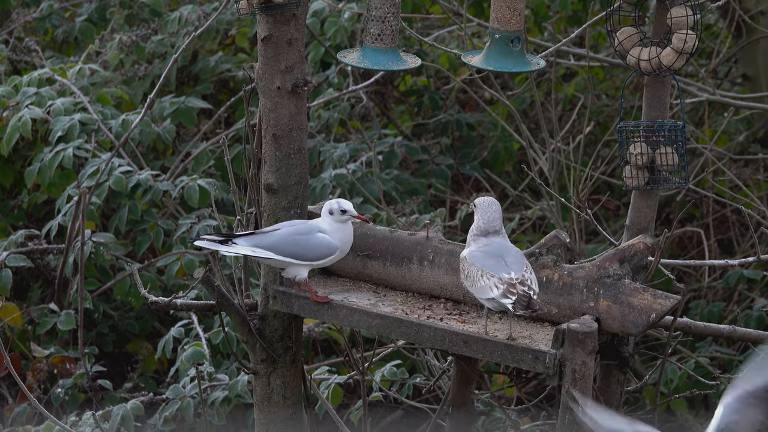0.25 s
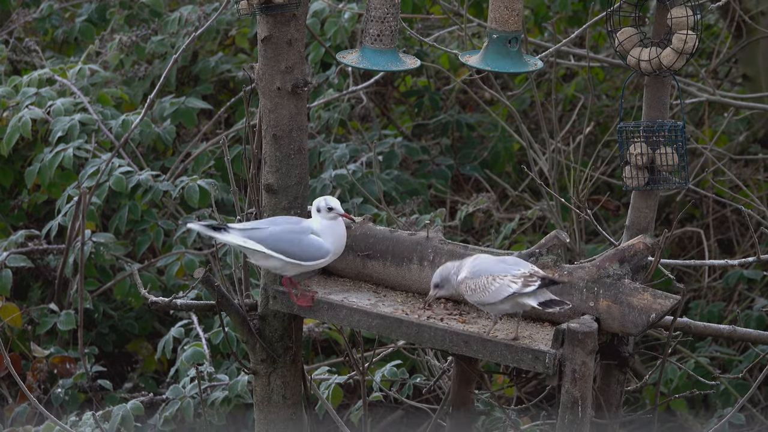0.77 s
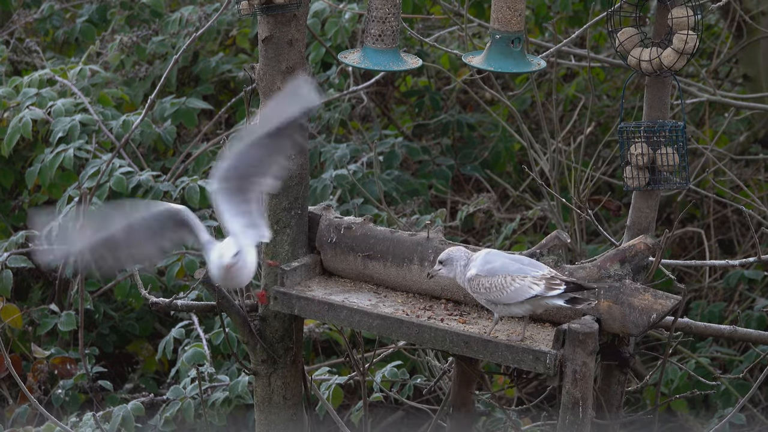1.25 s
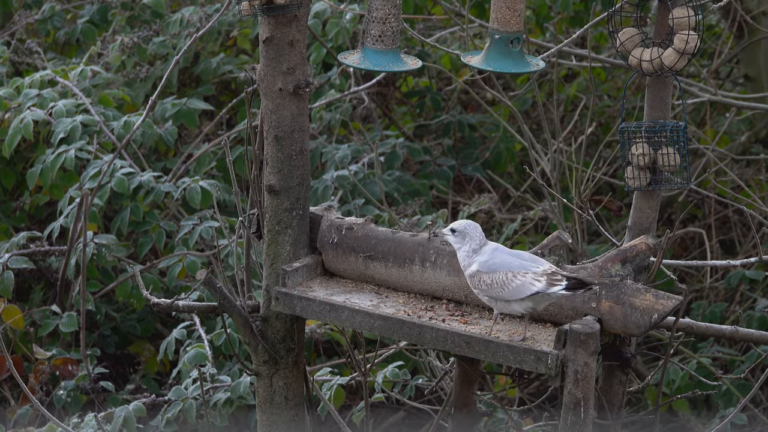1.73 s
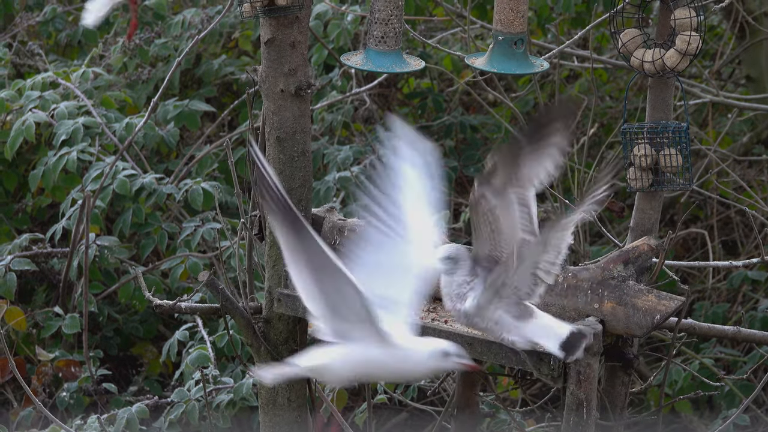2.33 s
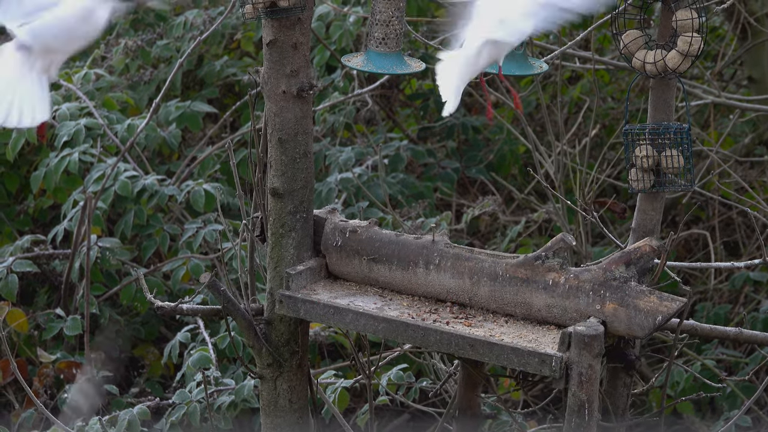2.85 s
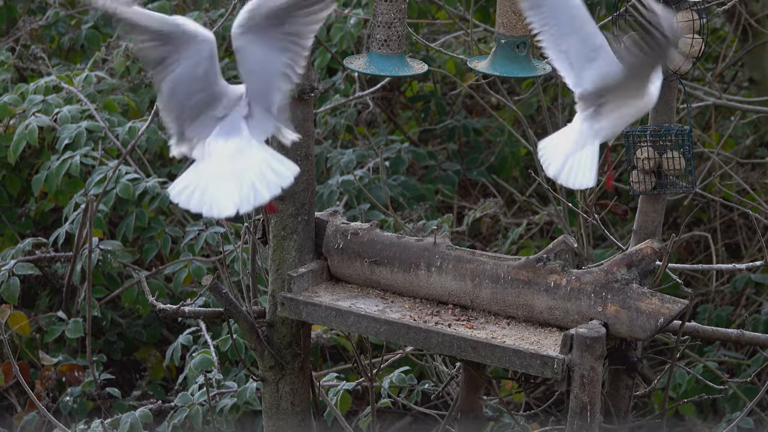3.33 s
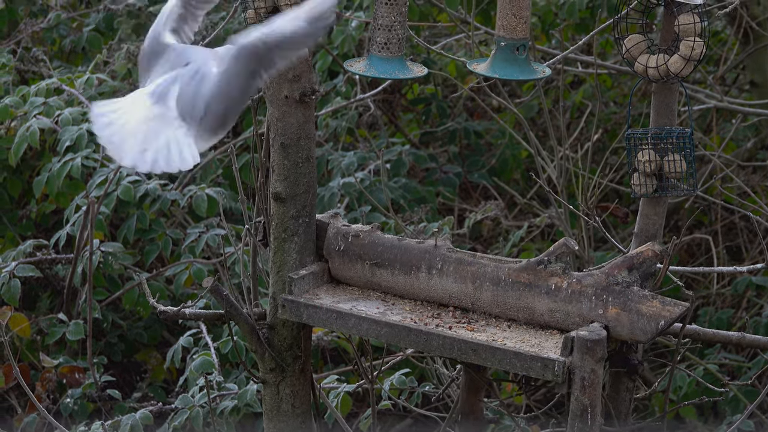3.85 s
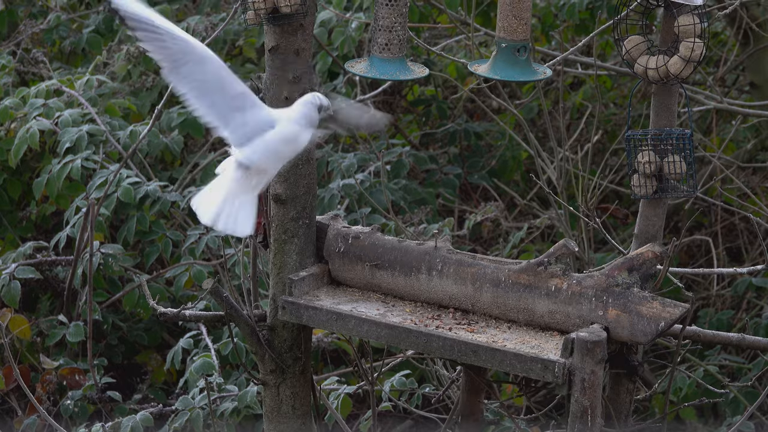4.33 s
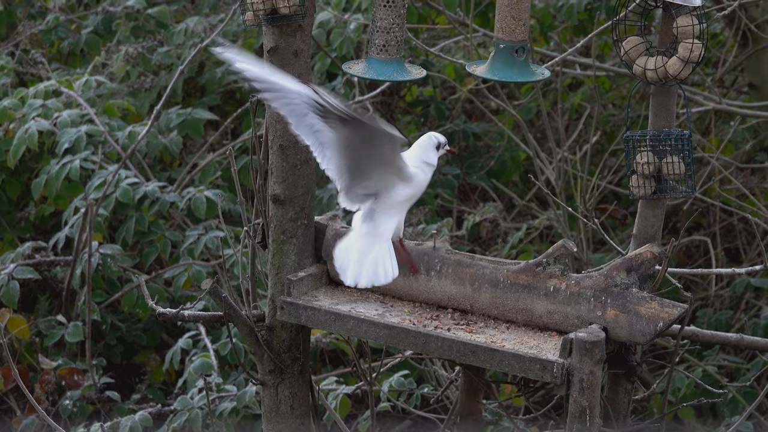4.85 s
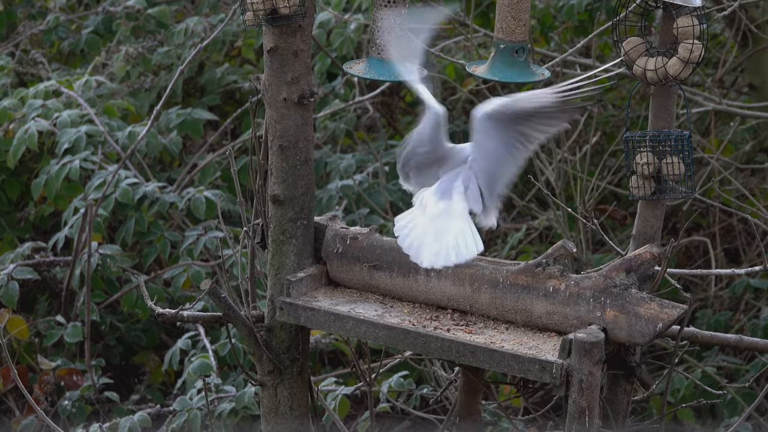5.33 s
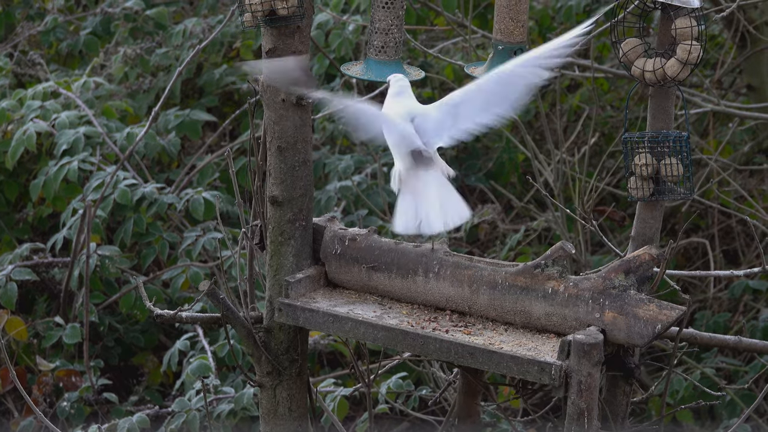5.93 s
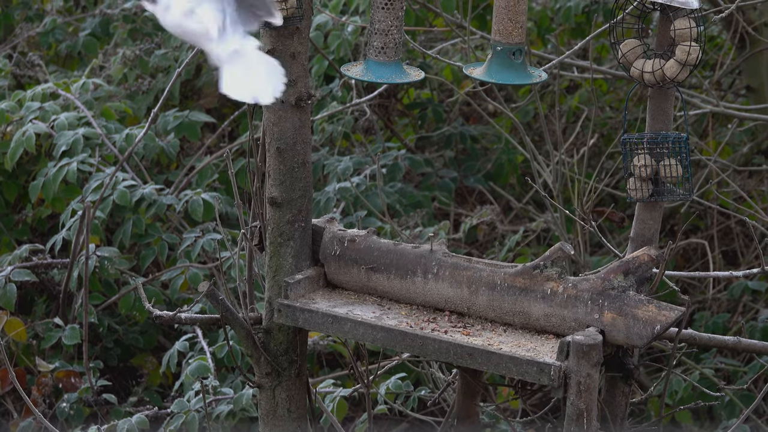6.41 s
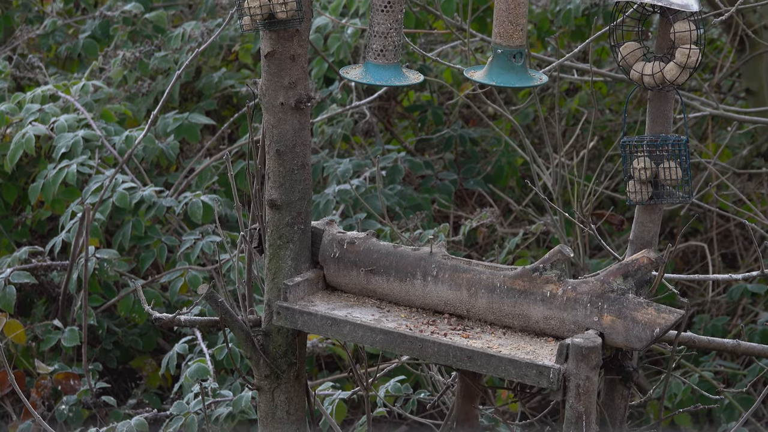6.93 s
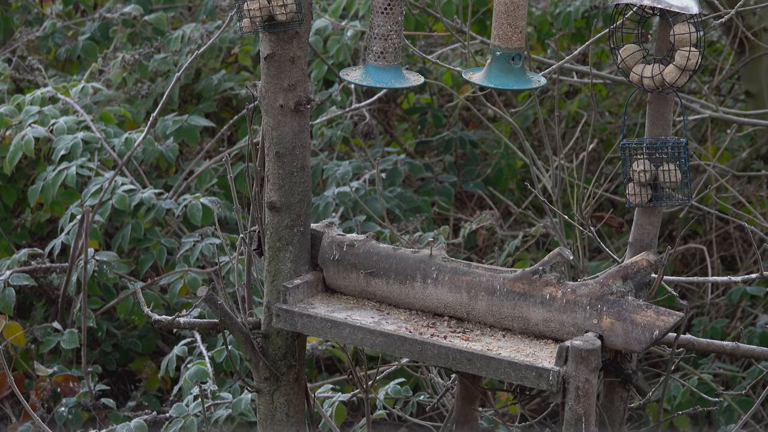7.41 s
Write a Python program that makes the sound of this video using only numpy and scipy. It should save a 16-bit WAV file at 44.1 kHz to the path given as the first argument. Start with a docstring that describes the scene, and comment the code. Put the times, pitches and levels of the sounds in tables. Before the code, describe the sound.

Close gulls whine and chatter outdoors, then one screams hoarsely again and again over a faint distant flock, finishing on a growling cry.

```python
"""Gulls squabbling in a garden

Thin falling whines, short rattling keks, then a run of harsh arched cries and a low growl.
Voices are sums of partials shaped by throat and beak; a harsh cry shuts and reopens about 90 times a second.
Hedges scatter the calls. Behind lie more gulls, taps on a wooden tray, wingbeats and a far engine
(a few low sine orders), with coloured noise for air, hiss and rumble."""
import sys
import numpy as np
from scipy import signal
from scipy.fft import rfft, irfft, next_fast_len
from scipy.io import wavfile
from scipy.ndimage import uniform_filter1d

SR = 44100
rng = np.random.default_rng(int(sys.argv[2]) if len(sys.argv) > 2 else 0)


def wav_record(signal):
    """Record a signal, one row per channel, as 16-bit PCM in the file named by sys.argv[1]."""
    frames = np.transpose(np.atleast_2d(signal))
    bounded = np.clip(frames, -1, 1)
    # unit amplitude maps onto the largest positive 16-bit level
    quanta = np.round(bounded * 32767).astype(np.int16)
    wavfile.write(sys.argv[1], SR, quanta)


N = 338247
CUTOFF_HZ = 15800

# Throat colour of the harsh cries. Each row: frequency in Hz, relative gain in dB.
CRY_THROAT = [(350, -48), (600, -18.5), (1000, -16.5), (1400, -4), (1950, -3.5), (2500, -0.5), (2900, -9.5),
              (3400, -23.5), (4000, -13), (4900, -16.5), (5600, -32.5), (6500, -50), (9000, -58),
              (11000, -74)]


def from_db(db):
    """Decibels to gain."""
    return 10 ** (np.asarray(db) / 20)


def rms_one(x):
    """Scale to unit power."""
    return x / np.sqrt(np.mean(x ** 2) + 1e-20)


def seconds(length_s):
    """Sample times from zero to the given length."""
    return np.arange(int(length_s * SR)) / SR


def bell(t, width_s):
    """1 at time zero, dying away smoothly on both sides."""
    return np.exp(-(t / width_s) ** 2)


def at_hz(points, hz):
    """Gain of a spectrum at the given frequencies, interpolated over log frequency."""
    f, db = np.transpose(points)
    return from_db(np.interp(np.log(hz + 1e-9), np.log(f), db))


def over_time(rows):
    """A (time, value) table interpolated over the whole scene."""
    return np.interp(np.arange(N) / SR, *np.transpose(rows))


def read(rows):
    """Sample times across a table, then each of its columns at those times."""
    s, *columns = np.transpose(rows)
    t = np.arange(int(max(s[0], 0) * SR), int(s[-1] * SR)) / SR
    return [t] + [np.interp(t, s, c) for c in columns]


def add(out, start_s, x):
    """Mix a sound in at its start time, trimmed to the scene."""
    i = int(start_s * SR)
    x, i = x[max(-i, 0):], max(i, 0)
    out[i:i + len(x)] += x[:max(N - i, 0)]


def coloured(x, spectrum):
    """Pass a sound through a smooth spectrum."""
    size = next_fast_len(len(x) + 512)
    gain = at_hz(spectrum, np.fft.rfftfreq(size, 1 / SR))
    return irfft(rfft(x, size) * gain, size)[:len(x)]


def noise(spectrum, size):
    """Coloured noise of unit power."""
    return rms_one(coloured(rng.standard_normal(size), spectrum))


def drift(rate_hz, size):
    """Random wandering with a spread near 1."""
    at = np.arange(size) * rate_hz / SR
    knots = int(at[-1]) + 2
    return np.interp(at, np.arange(knots), rng.standard_normal(knots))


def evened(x):
    """Hold the power steady over about 23 ms."""
    return x / np.sqrt(np.abs(uniform_filter1d(x * x, size=1000)) + 1e-12)


def faded(x):
    """Soft start and stop of a few milliseconds."""
    return x * signal.windows.tukey(len(x), min(1, 300 / len(x)))


def flutter(rate_hz, size, unevenness):
    """Opening of the syrinx, 0 to 1: rounded pulses with sharp closures between them."""
    turns = rng.random() + np.cumsum(rate_hz * (1 + unevenness * drift(rate_hz, size))) / SR
    return np.abs(np.sin(np.pi * turns))


def harmonics(pitch_hz, throat, beak_hz=2000, beak_db=0, beak_width_hz=300, count=26):
    """The voice's partials, weighted by the throat and by the resonance of the open beak."""
    k = np.arange(1, count + 1)[:, None]
    hz = k * pitch_hz
    beak = from_db(beak_db / (1 + ((hz - beak_hz) / beak_width_hz) ** 2))
    gain = at_hz(throat, hz) * beak * (hz < CUTOFF_HZ)
    phase = 2 * np.pi * np.cumsum(hz, axis=1) / SR + k * k / 2
    return evened(np.sum(gain * np.sin(phase), axis=0))


def with_effort(x, level_db, treble_db):
    """Effort sets the loudness of a call and, apart from it, the strength of its upper resonances."""
    low = signal.sosfiltfilt(signal.butter(8, 3250, fs=SR, output="sos"), x)
    return faded(from_db(level_db) * (evened(low) + from_db(treble_db) * evened(x - low)))


def harsh_cry(pitch_hz, level_db, treble_db, beak_hz, roughness, pulse_hz, swing, jitter, rasp,
              beak_db, beak_width_hz):
    """Pitch climbs and arches within every pulse, and shakes at random most as the voice closes."""
    attack_s = .017
    pulse_sweep = .035   # share by which pitch climbs through a pulse, scaled by roughness
    pulse_spread, pulse_spread_db = .016, 3.5   # pulses differ in pitch and in strength
    size = len(pitch_hz)
    weak = np.clip((level_db.max() - level_db) / 15, 0, 1)
    rough = np.clip(roughness, 0, 1) + .45 * weak   # hoarser at the weak start and end
    opening = flutter(pulse_hz, size, unevenness=.07)

    arch = (opening - np.pi / 4) * (1 + .35 * drift(pulse_hz, size))
    climb = -np.gradient(opening ** 2) * SR / (np.pi * pulse_hz)
    shake = (1.04 - opening) * drift(700, size)
    bend = swing * arch + pulse_sweep * climb + pulse_spread * drift(pulse_hz, size) + jitter * shake
    pitch_hz = pitch_hz * (1 + rough * bend)

    tone = harmonics(pitch_hz, CRY_THROAT, beak_hz, beak_db, beak_width_hz)
    pulses = .07 + opening ** (.45 + .25 * rough)
    crackle = from_db(3.2 * rough ** 2 * drift(300, size))
    air = rasp * rough * noise(CRY_THROAT, size)
    highpass = signal.butter(4, 520, "high", fs=SR, output="sos")
    voice = signal.sosfilt(highpass, tone * pulses * crackle + air)
    attack = np.minimum(np.arange(size) / SR / attack_s, 1)
    level_db = level_db + pulse_spread_db * rough ** 2 * drift(pulse_hz, size) / 2
    return attack * with_effort(voice, level_db, treble_db)


def cries(beak_db=13, beak_width_hz=440):
    """Each cry scoops up to its top pitch as the beak opens, holds, then droops."""
    # Each row: start in seconds, length in seconds, pitch rise in seconds, swell in seconds,
    # start pitch in Hz, top pitch in Hz, end pitch in Hz, level in dB, treble in dB re level,
    # open-beak resonance in Hz, base roughness 0-1.
    cry_rows = [(3.206, 0.16, 0.051, 0.023, 638, 964, 810, -32, -13.5, 2410, 0.8),
                (3.689, 0.19, 0.045, 0.027, 609, 1010, 717, -27.5, -17.5, 2140, 0.74),
                (4.154, 0.23, .058, 0.044, 573, 907, 637, -29, -13, 2220, 0.94),
                (4.561, 0.23, 0.069, 0.083, 530.3, 840.6, 774, -25, -14, 2266, 0.77),
                (4.958, 0.26, 0.076, 0.063, 588, 977, 870, -25.5, -15, 2000, 0.8),
                (5.368, 0.24, .037, 0.056, 672.6, 1009, 916, -26, -22, 2010, 0.56),
                (5.712, .21, 0.036, 0.064, 629.7, 1015, 930, -24, -25.5, 2010, .42),
                (6.065, .21, .038, 0.043, 656, 990, 886, -25, -26, 1874, 0.48),
                (6.395, 0.22, .052, 0.07, 667, 978, 839, -24.5, -14, 1740, 0.59),
                (6.742, 0.24, 0.15, 0.053, 625, 722, 658, -25.5, -10, 2300, 0.5),
                (7.132, .25, 0.096, 0.082, 526.4, 696.5, 618, -26, -11, 2090, 0.4)]
    droop_s, droop_db, swell_db = .035, 14, 12
    thin_treble_db = 2   # the weak ends are thinner than the middle
    beak_opening, beak_closing = .18, .05   # share by which the resonance lies lower at start and end
    out = np.zeros(N)
    for (start_s, length_s, rise_s, swell_s, start_hz, top_hz, end_hz,
         level_db, treble_db, beak_hz, roughness) in cry_rows:
        t = seconds(length_s)
        scoop, swell, droop = bell(t, rise_s), bell(t, swell_s), bell(length_s - t, droop_s)
        pitch_hz = top_hz + (start_hz - top_hz) * scoop + (end_hz - top_hz) * droop
        level = level_db - swell_db * swell - droop_db * droop
        treble = treble_db + thin_treble_db * (swell + droop)
        beak = beak_hz * (1 - beak_opening * scoop - beak_closing * droop)
        cry = harsh_cry(pitch_hz, level, treble, beak, roughness, pulse_hz=90, swing=.19, jitter=.1,
                        rasp=.12, beak_db=beak_db, beak_width_hz=beak_width_hz)
        add(out, start_s, cry)
    return out


def growl(beak_db=34, beak_width_hz=600, chest_db=-15.5):
    """A close cry that pulses more slowly, with a low rasp under it."""
    # Each row: time in seconds, pitch in Hz, level in dB, treble in dB re level, beak resonance in Hz.
    growl_rows = [(7.385, 677, -34, -10, 1490), (7.399, 639.7, -31, -22, 1480),
                  (7.421, 741.5, -33, -26.5, 1630), (7.437, 625.2, -29, -26, 1564),
                  (7.471, 758, -27, -28.5, 1530), (7.541, 823.4, -23, -28, 1536),
                  (7.67, 741.5, -22.5, -22, 1710)]
    chest_spectrum = [(380, -44), (650, -2.5), (1050, 12), (1400, 0)]   # Hz, dB
    out = np.zeros(N)
    t, *controls = read(growl_rows)
    cry = harsh_cry(*controls, roughness=.55, pulse_hz=58, swing=.2, jitter=.26, rasp=.2,
                    beak_db=beak_db, beak_width_hz=beak_width_hz)
    add(out, t[0], cry)
    chest = coloured(out * (1 + drift(900, N)), chest_spectrum)
    return out + from_db(chest_db) * chest


def through_registers(t, registers):
    """Pitch, level, treble and gape of a whine: sags and fades in a register, then slides to the next."""
    sag_per_s, fade_db_per_s = .56, 11   # exponential rate of the pitch sag; fall of the level
    state = None
    for s, slide_s, hz, level_db, treble_db, gape_db in registers:
        pitch_hz = hz * np.exp(-sag_per_s * (t - s))
        level = level_db - fade_db_per_s * (t - s)
        held = np.array(np.broadcast_arrays(pitch_hz, level, treble_db, gape_db))
        if state is None:
            state = held
        else:
            state = state + (held - state) * (1 + np.tanh(2 * (t - s) / slide_s)) / 2
    return state


def whines(beak_hz=2650, beak_width_hz=380, beak_gain_db=10, crack_s=0.0072):
    """Falling stacks of partials; at a catch or sudden drop the voice sags and turns hoarse briefly."""
    # Each row: end in seconds, list of registers. Each register: time in seconds, slide in seconds,
    # pitch in Hz, level in dB, treble in dB re level, gape (beak resonance in dB re beak_gain_db).
    # The first register's time and slide are the whine's start and scoop width.
    whine_rows = [(.32, [(-.1, .03, 593, -36, 5, -14), (.003, 0.036, 512, -44, 3.5, -24),
                  (.073, 0.017, 523, -40.5, 4, -13), (.138, 0.0466, 381, -43, 2, -2),
                  (.195, .03, 407, -43.5, -3.5, -9), (.252, 0.04, 320, -43.5, -3, 10)]),
                  (1.412, [(.665, 0.036, 956.6, -30, -8, 2), (.944, 0.0059, 620.5, -34.5, -7, -6),
                  (1.12, 0.029, 471.4, -41.5, -4, -10), (1.265, 0.067, 327, -44, -6, -9)]),
                  (2.5, [(1.775, .03, 922.5, -27, -15, -20), (2.028, 0.00597, 601, -32, -15, -14.5),
                  (2.147, 0.035, 395, -37, -23, -19), (2.265, 0.072, 322.5, -39, -12.5, -25),
                  (2.39, 0.0685, 252.6, -41, -17, -35)]), (3.098, [(2.895, 0.035, 881, -34.5, -21, -15)])]
    # Catches without a change of register. Each row: time in seconds, depth 0-1.
    catches = [(.675, 0.99), (0.702, 0.87), (0.746, 0.72), (0.803, .7), (.898, .35), (1.784, 0.98),
               (1.81, 0.63), (1.896, 0.25)]
    # Each row: frequency in Hz, relative gain in dB.
    whine_throat = [(250, -79), (450, -22.5), (850, -30), (1200, -17.5), (1700, 5.5), (2100, 0), (2600, -9),
                    (3000, -18), (3600, -2), (4300, -10.5), (5200, -32.5), (6500, -55), (8000, -45.5),
                    (10000, -69)]
    scoop_share, scoop_db = .27, 10.5   # starts this share flat and this much weaker
    release_s = .031
    out = np.zeros(N)
    for end_s, registers in whine_rows:
        start_s, scoop_s = registers[0][:2]
        t = start_s + seconds(end_s - start_s)
        pitch_hz, level_db, treble_db, gape_db = through_registers(t, registers)
        scoop = bell(t - start_s, scoop_s)
        slack = np.clip((480 - pitch_hz) / 200, 0, 1)   # low registers creak
        # quick slides crack hardest
        drops = [(s, min(crack_s / slide_s, 1)) for s, slide_s, *_ in registers[1:]]
        crack = sum(depth * bell(t - s, crack_s) for s, depth in catches + drops)
        shake = (.004 + .009 * slack + .08 * crack) * drift(500, len(t))
        pitch_hz = pitch_hz * (1 - scoop_share * scoop) * (1 + shake - .14 * crack)
        tone = harmonics(pitch_hz, whine_throat, beak_hz, gape_db + beak_gain_db, beak_width_hz)
        breath = (.05 + .35 * crack) * noise(whine_throat, len(t))
        voice = tone * (1 - .55 * crack) + breath
        release = 1 - bell(end_s - t, release_s)
        add(out, start_s, release * with_effort(voice, level_db - scoop_db * scoop, treble_db))
    return out


def keks(foot_hz=640, rise=0.55, pulse_s=0.01334, gap_s=.0112, beak_db=15, beak_width_hz=200):
    """Rattles of uneven voiced pulses, each arching in pitch; the beak opens and closes over them."""
    # Each row: start in seconds, length in seconds, mid-call level in dB, open-beak resonance in Hz.
    kek_rows = [(0.044, 0.066, -31, 2850), (.287, 0.067, -37, 3430), (0.496, 0.063, -40, 3370),
                (0.748, 0.081, -36.5, 2260), (0.881, 0.1, -43, 2440), (1.011, 0.11, -36, 2932),
                (1.245, 0.06, -33.5, 3006), (1.726, 0.06, -33.5, 2240), (1.791, 0.054, -33.5, 2560),
                (1.985, 0.054, -28, 2950), (2.199, 0.099, -27.5, 2890), (2.429, 0.065, -33.5, 2823),
                (2.894, 0.065, -32.5, 2604), (3.107, 0.075, -33, 3260), (3.15, 0.1, -32, 2400),
                (3.336, 0.049, -30.5, 3320), (3.507, 0.061, -37, 2250), (4.006, 0.076, -35, 2020),
                (4.554, 0.074, -32.5, 2188), (4.806, 0.061, -36, 2183), (5.267, 0.18, -38, 2995),
                (5.486, 0.039, -31, 3300), (5.542, 0.048, -32, 2870), (5.689, 0.05, -35, 3200),
                (5.78, .033, -35.5, 3330), (6.008, 0.084, -32.5, 2760)]
    # Each row: frequency in Hz, relative gain in dB.
    kek_throat = [(400, -44.5), (900, -25.5), (1300, -5), (1750, 7), (2100, 0.5), (2500, -11), (2900, -14),
                  (3600, -14), (4600, -25.5), (6000, -40), (9000, -65.5)]
    out = np.zeros(N)
    u = np.linspace(0, 1, int(pulse_s * SR))
    envelope = np.sin(np.pi * u ** .55) ** 2
    for start_s, length_s, peak_db, beak_hz in kek_rows:
        for at_s in np.arange(0, length_s - gap_s / 2, gap_s):
            gape = np.sin(np.pi * (at_s + gap_s / 2) / length_s)
            arch = rise * gape * rng.uniform(.7, 1.2) * np.sin(u * 2.5) ** 2
            pitch_hz = foot_hz * (1 + arch + .04 * drift(500, len(u)))
            beak = beak_hz * (.84 + .16 * gape)
            voice = harmonics(pitch_hz, kek_throat, beak, beak_db, beak_width_hz, count=10)
            swell = gape ** .6 * from_db(peak_db + 2 * rng.normal())
            add(out, start_s + at_s + rng.normal(0, .001), swell * voice * envelope)
    return out


def bent_calls(edge_share=0.28):
    """Fainter, slowly pulsing, breathy cries with one bend of pitch each, most of them further off."""
    # Each row: start in seconds, length in seconds, start, middle and end pitch in Hz, level in dB.
    # The last row is the rising hook that opens the growl.
    call_rows = [(0, 0.37, 1120, 790, 661, -50), (1.4, 0.12, 668, 628, 570, -54.5),
                 (2.127, 0.041, 650, 930, 1405, -39), (3.058, 0.13, 545.5, 648.5, 566, -48.5),
                 (3.553, .08, 590, 625.3, 608.5, -49), (3.645, 0.084, 706, 740.5, 693, -44.5),
                 (3.809, .058, 535, 586, 588, -44.5), (5.053, .35, 690.5, 755, 700.5, -53),
                 (5.891, .21, 583, 754, 632.5, -43), (6.599, 0.36, 1079, 988, 892, -34.5),
                 (6.927, .21, 736, 664.4, 537, -37), (7.388, .048, 594, 693, 925, -38.5)]
    # Each row: frequency in Hz, relative gain in dB.
    bent_throat = [(300, -26), (550, -6.5), (1000, -5.5), (1400, 0.5), (2100, -1.5), (3200, -24),
                   (4100, -10), (5200, -25), (6500, -52)]
    out = np.zeros(N)
    for start_s, length_s, start_hz, middle_hz, end_hz, level_db in call_rows:
        u = seconds(length_s) / length_s
        bend_hz = np.polyval(np.polyfit([0, .5, 1], [start_hz, middle_hz, end_hz], 2), u)
        opening = flutter(60, len(u), unevenness=.15)
        pitch_hz = bend_hz * (1 + .1 * (opening - np.pi / 4) + .055 * drift(800, len(u)))
        tone = (.6 + opening) * harmonics(pitch_hz, bent_throat, count=10)
        voice = tone + .25 * noise(CRY_THROAT, len(u))
        envelope = signal.windows.tukey(len(u), edge_share)
        add(out, start_s, from_db(level_db) * envelope * evened(voice))
    return out


def taps(t60_s=0.024):
    """Bill and feet tap the wooden tray: dry knocks that die at once in the damp wood."""
    # Each row: time in seconds, onset level in dB.
    tap_rows = [(1.708, -42), (2.621, -50.5), (2.889, -42), (5.264, -52)]
    # Each row: frequency in Hz, relative gain in dB.
    tray_spectrum = [(300, -15.5), (900, -1), (2000, 0), (4000, 7), (5500, -7), (8000, -32), (12000, -31)]
    out, t = np.zeros(N), np.arange(SR // 20) / SR
    for s, peak_db in tap_rows:
        add(out, s, from_db(peak_db - 60 * t / t60_s) * noise(tray_spectrum, len(t)))
    return out


def wings(stroke_s=.1):
    """Wingbeats near the microphone: each stroke pushes a puff of air and brushes the feathers."""
    # Each row: mid-stroke in seconds, thump level in dB, feather swish level in dB.
    beat_rows = [(1.15, -71, -85), (1.959, -74, -83), (2.35, -69, -77), (2.461, -88, -53),
                 (2.62, -100, -65), (4.73, -72, -79), (6.9, -72, -79), (7.378, -84, -52)]
    # Puff and feather colours. Each row: frequency in Hz, relative gain in dB.
    thump_spectrum = [(25, -18), (70, 2), (110, 3.5), (220, -41), (800, -53)]
    feather_spectrum = [(300, -20), (1500, 6.5), (4500, -12.5), (6500, -17), (11000, -16.5), (16000, -16)]
    out, stroke = np.zeros(N), np.hanning(int(stroke_s * SR))
    for s, thump_db, swish_db in beat_rows:
        thump = from_db(thump_db) * noise(thump_spectrum, len(stroke))
        swish = from_db(swish_db) * noise(feather_spectrum, len(stroke))
        add(out, s - stroke_s / 2, stroke * (thump + swish))
    return out


def garden(x, t60_s=0.14, scatter_db=-21, first_s=0.004):
    """Trunks and hedges return a thin, dying scatter of echoes."""
    t = np.arange(SR) / SR
    sparse = rng.standard_normal(SR) * (rng.random(SR) < .03)
    echoes = sparse * (t > first_s) * from_db(-60 * t / t60_s)
    unit_echoes = echoes / np.sqrt(np.sum(echoes ** 2))
    return from_db(scatter_db) * signal.fftconvolve(x, unit_echoes)[:N]


def flock(level_db=-62, count=40):
    """Gulls far beyond the hedge: faint arched cries at random moments."""
    out = np.zeros(N)
    for when, span, height, strength in rng.random((count, 4)):
        u = np.linspace(0, 1, int((.12 + .2 * span) * SR))
        arch = 1 + .15 * np.sin(3.6 * u) + .04 * drift(600, len(u))
        pitch_hz = (520 + 380 * height) * arch
        voice = harmonics(pitch_hz, CRY_THROAT, count=8) * flutter(85, len(u), unevenness=.15)
        gain = from_db(level_db + 6 * strength) * np.sin(np.pi * u)
        add(out, when * N / SR, gain * voice)
    return out


def engine():
    """A few wavering low orders of a far engine, fading away."""
    # Each row: time in seconds, turns in Hz, base level in dB ahead of the order and channel gains.
    engine_rows = [(0, 32.54, -74), (1.8, 33.5, -73), (3.1, 32.93, -77), (3.7, 33.38, -87),
                   (7.67, 33.04, -93)]
    # Each row: multiple of the turn rate, mean gain in dB.
    orders = [(3, -7.5), (5, -2), (6, -3.5), (8, -2.5), (9, -11)]
    out = np.zeros(N)
    t, turns_hz, level_db = read(engine_rows)
    size = len(t)
    phase = 2 * np.pi * np.cumsum(turns_hz * (1 + .004 * drift(17, size))) / SR
    hum = np.zeros(size)
    for k, db in orders:
        hum += from_db(db + 4 * drift(7, size)) * np.sin(k * phase + 1.8 * drift(20, size))
    add(out, 0, from_db(level_db) * hum)
    return out * from_db([[-5], [3]])


def mid_and_side(spectrum, side_db):
    """Noise common to both channels plus a weaker one in opposite phase."""
    apart = np.array([[1], [-1]])
    return noise(spectrum, N) + from_db(side_db) * noise(spectrum, N) * apart


def distant_air(side_db=-22, flicker_db=2):
    """Distant flock and garden air: flickering noise that swells as the far flock grows excited."""
    # Each row: frequency in Hz, relative gain in dB.
    air_spectrum = [(250, -38.5), (380, -24.5), (600, -6), (900, -7.5), (1200, -2.5), (1750, -2.5),
                    (2100, -4), (2600, -13), (3100, -11.5), (3800, -12.5), (4900, -17.5), (6000, -33.5),
                    (8000, -56.5)]
    # Each row: time in seconds, mean level in dB.
    air_level = [(0, -54.5), (1.6, -56.5), (2.8, -54.5), (3.9, -52), (5.6, -52.5), (6.299, -48.5),
                 (7.67, -48)]
    gain = from_db(over_time(air_level) + flicker_db * drift(14, N))
    return gain * mid_and_side(air_spectrum, side_db)


def microphone_hiss(side_db=-12):
    """High coloured noise with a slowly changing level."""
    # Each row: frequency in Hz, relative gain in dB.
    hiss_spectrum = [(3000, -10), (7000, -17.5), (10000, -16), (11500, -9.5), (13000, -5.5), (16000, -6)]
    # Each row: time in seconds, level in dB.
    hiss_level = [(0, -67.5), (1.2, -65.5), (2.5, -62.5), (5.7, -64.5), (7.6, -61.5)]
    return from_db(over_time(hiss_level)) * mid_and_side(hiss_spectrum, side_db)


def port_rumble():
    """Stray air at each microphone port: independent, wavering low noise."""
    # Each row: frequency in Hz, relative gain in dB.
    rumble_spectrum = [(12, -19), (30, -17.5), (60, -0.5), (110, 6.5), (200, -12.5), (400, -14),
                       (1000, -40.5)]
    return np.array([from_db(db + 2.2 * drift(23, N)) * noise(rumble_spectrum, N) for db in (-88, -80)])


def scene():
    """Birds and garden reach both ports almost alike; engine level, rumble, some air and hiss differ."""
    birds = cries() + growl() + whines() + keks() + bent_calls() + flock() + taps()
    near_echo = garden(birds)
    far_echo = garden(birds, t60_s=1.3, scatter_db=-30, first_s=0.13)
    width = from_db(-14.5) * garden(birds) * np.array([[1], [-1]])
    background = distant_air() + microphone_hiss() + port_rumble()
    return birds + near_echo + far_echo + width + wings() + engine() + background


def record(dry):
    """The top is cut steeply by an elliptic low-pass."""
    return signal.sosfilt(signal.ellip(12, .1, 80, CUTOFF_HZ, fs=SR, output="sos"), dry)


dry = scene()
out = record(dry)
wav_record(out)
```